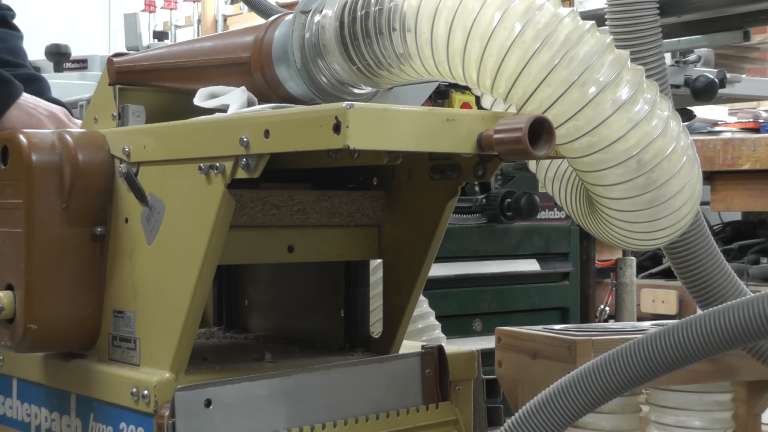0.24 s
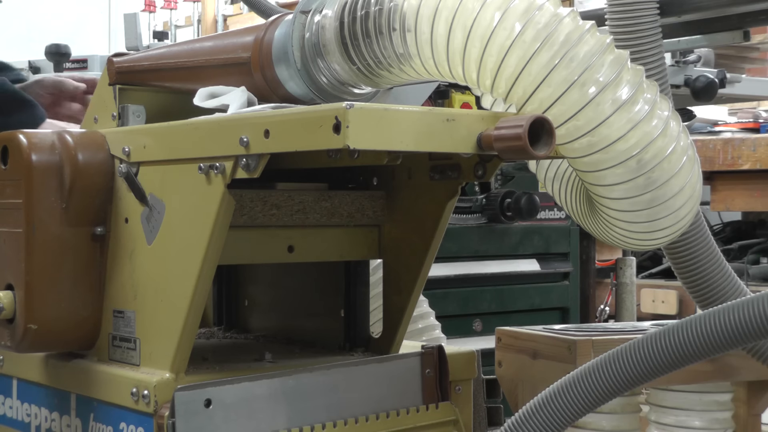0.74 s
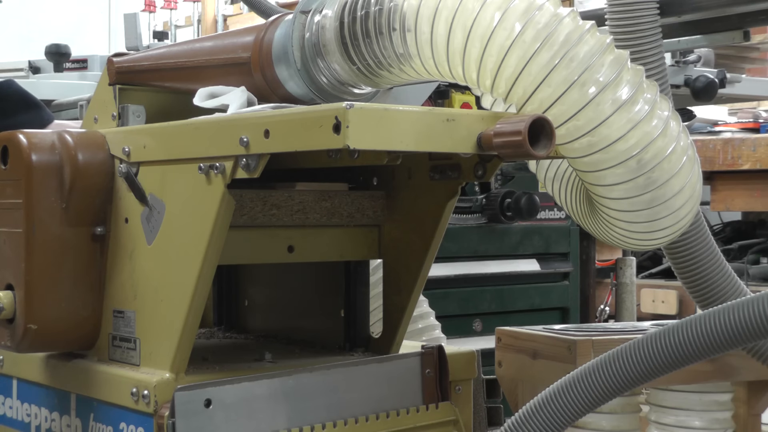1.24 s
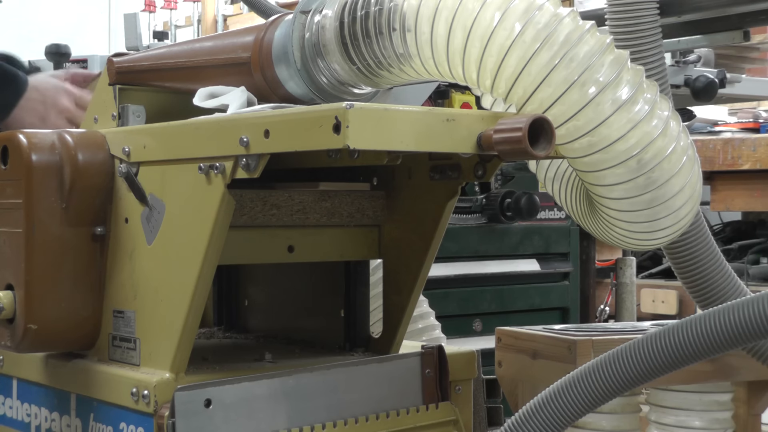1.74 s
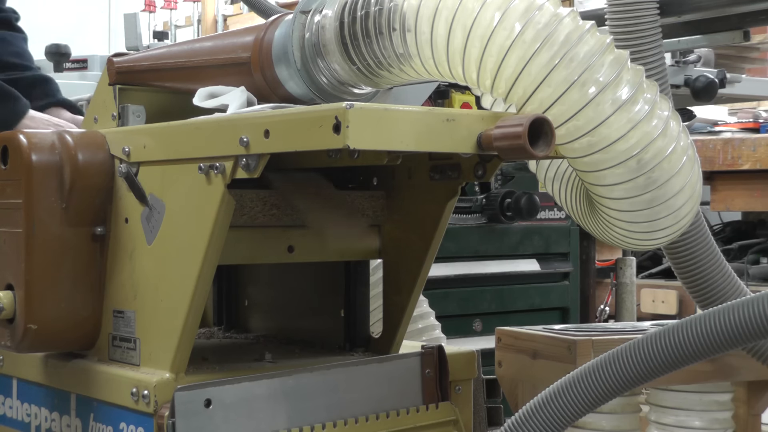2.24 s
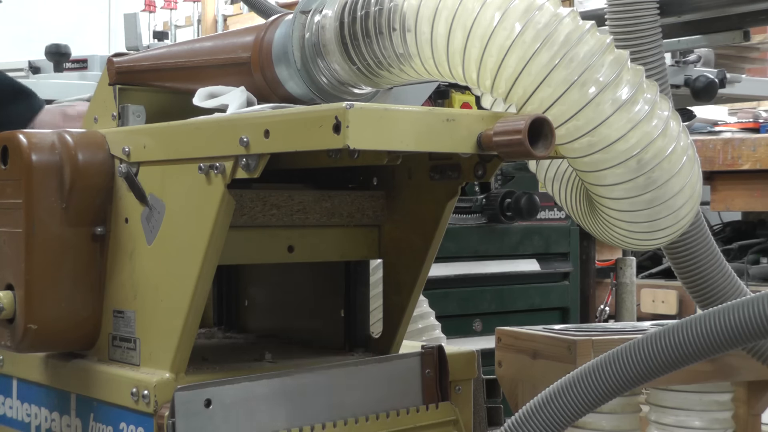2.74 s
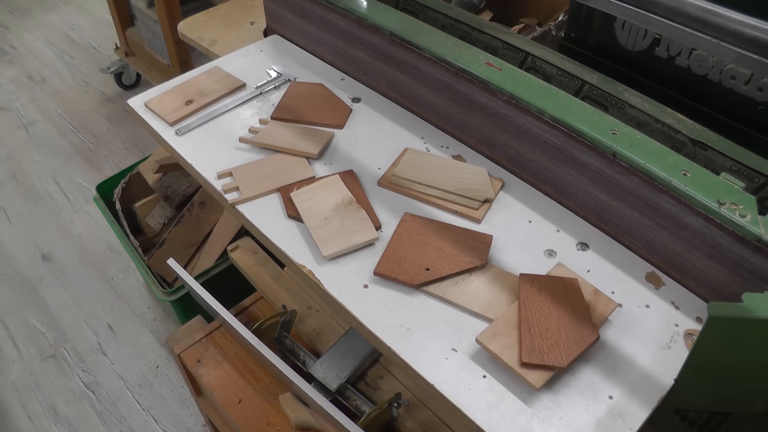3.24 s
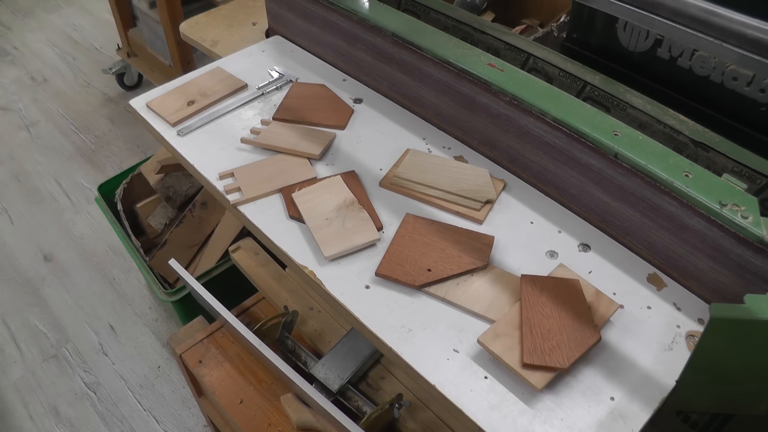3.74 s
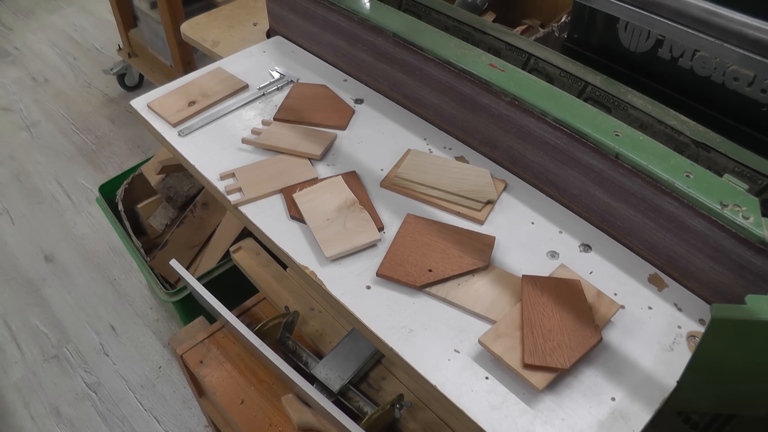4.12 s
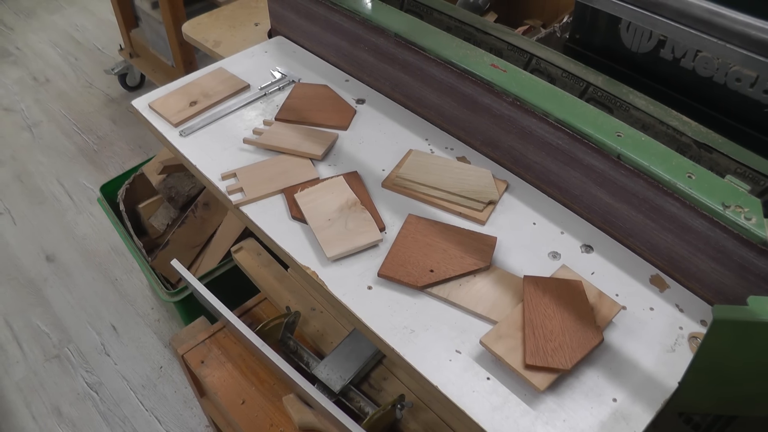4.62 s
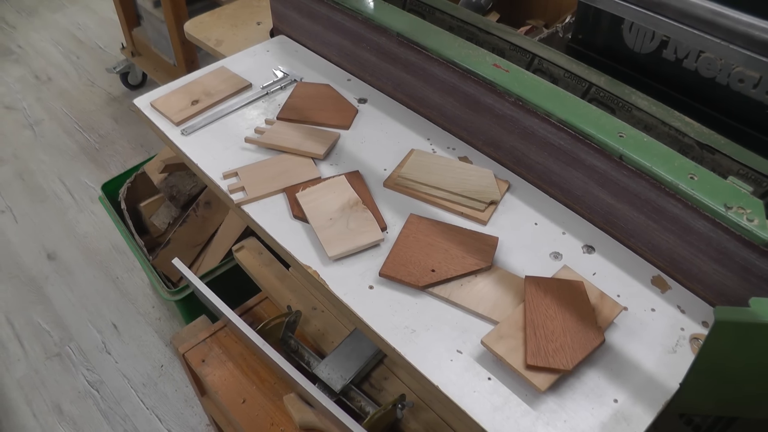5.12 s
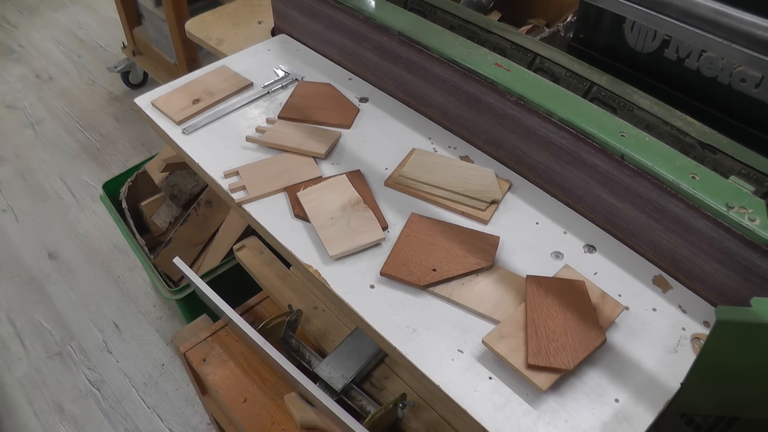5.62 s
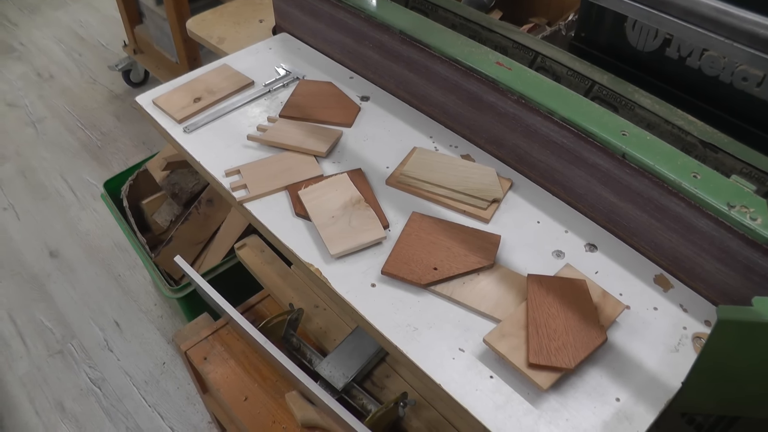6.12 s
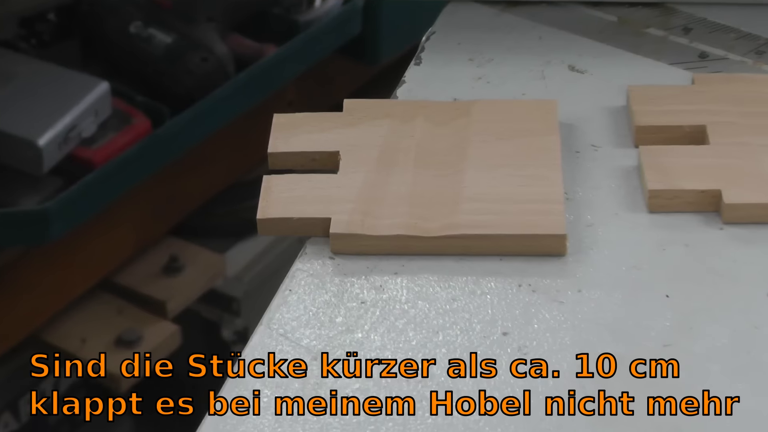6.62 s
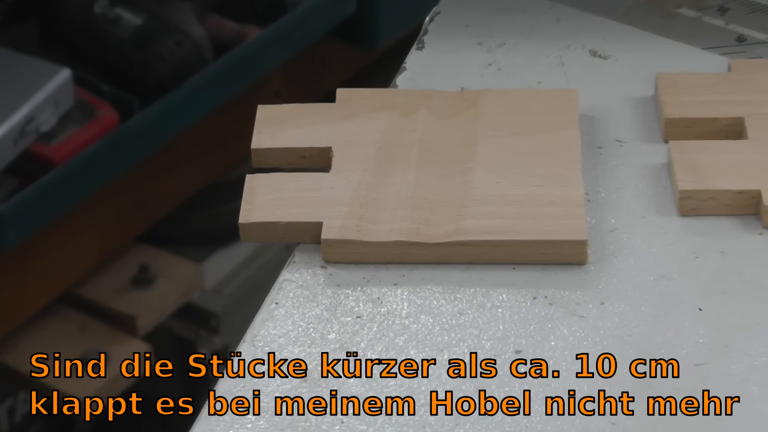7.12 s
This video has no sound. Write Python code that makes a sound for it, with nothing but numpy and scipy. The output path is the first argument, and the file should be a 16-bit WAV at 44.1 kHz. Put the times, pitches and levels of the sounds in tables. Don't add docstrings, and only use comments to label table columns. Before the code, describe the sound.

Harsh, buzzing board planing with knocks and extractor roar stops dead, leaving faint room hiss, handling ticks, one sharp snap and a weak hum.

```python
import sys
import numpy as np
from scipy import signal
from scipy.fft import rfft, irfft, next_fast_len
from scipy.io import wavfile
from scipy.ndimage import uniform_filter1d, map_coordinates

SR = 44100
rng = np.random.default_rng(int(sys.argv[2]) if len(sys.argv) > 2 else 0)


def convert_level_to_amplitude(level_db):
    exponent = np.asarray(level_db, float) / 20
    return 10 ** exponent


def wav_out(sig):
    wavfile.write(sys.argv[1], SR, np.round(np.clip(np.atleast_2d(sig).T, -1, 1) * 32767).astype(np.int16))


N = 325003
FFT_SIZE = next_fast_len(N)
T = np.arange(N) / SR
F = np.maximum(np.arange(FFT_SIZE // 2 + 1) * SR / FFT_SIZE, 1.)

CHANGES_S = [2.842, 6.421]

# start in seconds, shaft rate in Hz, air through the knife gap in dB,
# bite into the wood in dB, sharpness of the bite in dB.
PLANER = [(0, 107.4, -30.5, -32, -1), (.12, 108.5, -33.5, -36.5, 3), (.28, 107.6, -30, -33, -4),
          (.44, 107.1, -31, -35, 2), (.66, 107.7, -28.5, -33.5, -1), (.84, 108.4, -30, -35, 0.5),
          (1.07, 108.1, -30, -36.5, 3.5), (1.3, 108.6, -29, -40.5, 9), (1.4, 108.9, -29, -38.5, 5),
          (1.5, 109.6, -27.5, -56.5, 0.5), (1.6, 108.8, -25, -51, -12), (1.96, 109.2, -21.5, -48.5, -2),
          (2.03, 109.3, -23, -46.5, 4.5), (2.07, 108.5, -25.5, -35.5, 0.5), (2.22, 108.2, -26, -35.5, -3.5),
          (2.45, 108.2, -26, -34, -0.5), (2.62, 107.7, -26, -36.5, 3), (2.84, 107.5, -27.5, -31.5, -4)]
USUAL_AIR_DB, USUAL_SHARP_DB = -28, 1
# shaft multiple, level in dB at usual air, dB per dB of air.
SIREN = [(1, -69, 1.5), (2, -39.5, 0.72), (4, -28.5, 1.14), (6, -54, -2.1), (8, -38.5, 1.23),
         (10, -60.5, 2), (12, -51, 0.87), (14, -57.5, 1.05), (16, -61.5, 0.7), (18, -62, 1.2),
         (24, -66, 1.7)]
# shaft multiple, level in dB against the bite, sway in dB,
# sway rate in Hz, loudest moment in seconds.
BED = [(9, -20.5, 10.5, 0.47, 0.6), (10, -23, 2.5, 0.38, 0.43), (11, -9, 8.5, .48, 0.66),
       (12, -7, 6, .88, 2.285)]
BED_PER_SHARP = 0.61
# shaft multiple, level in dB.
SHAFT_ORDERS = [(1, -36.5), (2, -11), (3, -19), (4, 0), (5, -20.5), (6, -11), (7, -31), (8, -11),
                (9, -18.5)]
ODD_DB, ODD_SWAY_DB, ODD_SWAY_HZ, ODD_PEAK_S = -32, 7, 0.52, .6
CHATTER_RAD, CHATTER_HZ, FLUTTER_DB = .003, 44.5, 1
EVENNESS = .5
STRIKE = 0.28
CHIP_DB, ENTRY_S, ENTRY_DB, ENTRY_FADE_S = -6.5, 2.05, 6.5, 1
# frequency in Hz, density in dB per Hz.
BITE_COLOUR = [(400, -58.5), (950, -4.5), (1500, -6), (2000, -10), (2800, -8.5), (3200, -13.5), (5800, -17),
               (9200, -20.5), (11300, -23), (16000, -39.5)]
BITE_HZ = [1400, 2850, 5700, 10000]
# level in dB against the bite, dB per dB of sharpness, dB at the board's tail.
BITE = [
    (-6.5, 0.23, -1),
    (-4, 0, 0.5),
    (-1, 1, 0.5),
    (-13, 1.58, 6),
]
PATCH_DB, PATCH_HZ = 1.23, 6.99
TAIL_S = (1.07, 1.9)
# start
# in seconds, end in seconds, shaft multiple, level in dB.
SING = [(-0.05, 0.2, 16.0, -43.0), (-0.05, 0.21, 35.0, -43.0), (-0.05, 0.22, 18.0, -41.0),
        (-0.05, 0.5, 26.0, -37.0), (-0.03, 0.25, 50.0, -41.5), (-0.01, 0.28, 48.0, -40.5),
        (0.02, 0.24, 33.0, -43.5), (0.13, 0.54, 14.0, -42.5), (0.14, 0.5, 22.0, -36.5),
        (0.15, 0.45, 51.0, -47.5), (0.15, 0.47, 24.0, -38.0), (0.15, 0.75, 27.0, -39.0),
        (0.19, 0.78, 39.0, -44.5), (0.23, 0.57, 53.0, -44.5), (0.32, 0.54, 43.0, -45.5),
        (0.35, 0.67, 16.0, -43.0), (0.36, 0.56, 47.0, -43.0), (0.36, 0.73, 45.0, -41.5),
        (0.5, 0.68, 26.0, -45.5), (0.51, 0.92, 14.0, -46.0), (0.56, 0.95, 55.0, -47.0),
        (0.64, 0.88, 44.0, -46.0), (0.69, 0.88, 53.0, -43.5), (0.72, 1.04, 25.0, -41.0),
        (0.75, 1.02, 34.0, -45.0), (0.8, 1.08, 16.0, -44.5), (0.82, 1.06, 50.0, -45.5),
        (0.84, 1.08, 60.0, -44.5), (0.85, 1.06, 48.0, -45.5), (0.87, 1.28, 31.0, -43.5),
        (0.87, 1.29, 17.0, -41.0), (0.88, 1.15, 33.0, -43.0), (0.89, 1.12, 52.0, -44.5),
        (0.93, 1.22, 28.0, -43.0), (0.93, 1.48, 37.0, -40.0), (0.94, 1.28, 22.0, -42.5),
        (1.01, 1.28, 25.0, -46.5), (1.03, 1.24, 39.0, -44.5), (1.03, 1.36, 49.0, -42.5),
        (1.04, 1.23, 47.0, -41.5), (1.06, 1.42, 57.0, -39.0), (1.09, 1.45, 68.0, -46.0),
        (1.1, 1.44, 45.0, -41.0), (1.13, 1.45, 53.0, -41.0), (1.19, 1.44, 36.0, -44.0),
        (1.2, 1.44, 58.0, -42.0), (1.2, 1.5, 61.0, -46.0), (1.46, 2.07, 14.0, -47.5),
        (.17, .44, 23, -42), (.17, .44, 25, -42),
        (1.62, 2.5, 22.0, -45.5), (1.94, 2.28, 30.0, -43.0), (1.97, 2.54, 26.0, -44.0),
               (1.97, 2.57, 55.0, -49.0), (2.0, 2.23, 49.0, -44.5), (2.0, 2.27, 18.0, -44.0),
               (2.01, 2.33, 14.0, -41.0), (2.02, 2.34, 24.0, -47.5), (2.03, 2.24, 16.0, -44.5),
               (2.11, 2.43, 21.0, -42.0), (2.14, 2.49, 23.0, -42.5), (2.16, 2.48, 45.0, -48.5),
               (2.26, 2.63, 40.0, -47.0), (2.31, 2.63, 35.0, -47.5), (2.34, 2.64, 56.0, -49.0),
               (2.37, 2.83, 52.0, -45.0), (2.38, 2.69, 34.0, -47.5), (2.46, 2.75, 51.0, -48.0),
               (2.46, 2.82, 43.0, -46.5), (2.5, 2.89, 39.0, -45.0), (2.52, 2.89, 26.0, -43.5),
               (2.53, 2.75, 47.0, -48.0), (2.55, 2.89, 25.0, -41.5), (2.59, 2.83, 29.0, -45.0),
               (2.6, 2.87, 42.0, -47.0), (2.61, 2.89, 16.0, -39.0), (2.62, 2.89, 54.0, -46.5),
               (2.7, 2.89, 34.0, -45.0)]
SING_DB = -3
# frequency in Hz, density in dB per Hz.
CRUNCH = [(900, -19.5), (1400, 2.5), (2700, -2.5), (3600, -8.5), (6000, -19), (9000, -39)]
CRUNCH_DB, CRUNCH_FADE_S = -43, .35

# start in seconds, peak in dB, low ring in Hz, high ring in Hz,
# T60 in seconds.
KNOCKS = [(.079, -21, 1360, 3006, .035), (.087, -21.5, 1470, 3550, 0.056), (.088, -23, 5754, 4010, 0.032),
          (0.1, -24.5, 1160, 1600, 0.056), (.296, -27, 1350, 3600, 0.031), (.481, -21.5, 690, 1830, .04),
          (.485, -24.5, 1350, 1950, .03), (.493, -27, 1715, 1050, .05), (.497, -23.5, 947, 2908, .04),
          (.506, -28.5, 1130, 800, .06), (.515, -24, 404, 1248, 0.34), (2.044, -25.5, 2770, 3300, 0.038),
          (2.05, -27, 1710, 4670, .02), (2.075, -29.5, 3360, 5400, .02), (2.105, -27, 1820, 2680, 0.028),
          (2.135, -28.5, 3290, 5400, 0.017), (2.21, -31, 2380, 6000, .03)]
KNOCK_CRACK_DB = 3
# start in seconds, end in seconds, lowest Hz,
# highest Hz, number of chirps, level in dB.
TOP_CHIRPS = [(0, 1.45, 10200, 11700, 190, -61), (.8, 1.3, 11300, 12200, 12, -63),
              (2.05, 2.75, 10200, 11700, 90, -62), (.55, .62, 12700, 15400, 6, -70),
              (.2, 1.27, 13300, 15500, 8, -70), (1.3, 1.42, 11500, 15800, 40, -62),
              (1.5, 2.08, 10300, 11400, 40, -76), (1.5, 1.58, 12000, 15600, 14, -86),
              (1.66, 1.92, 12000, 15700, 50, -84), (1.95, 2.07, 12000, 15600, 34, -79),
              (2.13, 2.25, 12700, 15700, 8, -74), (2.43, 2.48, 11800, 15600, 12, -72)]

# frequency in Hz, density in dB per Hz.
ROAR_COLOUR = [(30, -43.5), (90, -26), (160, -17), (330, -9.5), (480, -7), (650, -1), (800, -7.5),
               (1000, -12), (1600, -17.5), (3000, -21.5), (6000, -24), (9000, -31.5), (9700, -40),
               (10300, -57.5), (16000, -69)]
ROAR_DB, ROAR_PER_AIR = -48.5, 0.83
# frequency in Hz, side minus mid in dB.
ROAR_SIDE = [(40, -3), (130, -7.5), (500, -6.5), (2000, -7.5), (10000, -16.5)]
# frequency in Hz, level in dB against the roar.
FAN = [(145.3, -10), (242.2, -2), (296.1, -2.5), (344.5, 1), (689, -9.5), (764.4, -5)]
# upper fan in Hz, how far the other lies below in Hz, upper level in dB against
# the roar, lower level in dB against the roar, loudest moment in seconds.
FAN_PAIR = (649.8, 3.713, 10.5, 4.6, 2.36)

# frequency in Hz, side minus mid in dB.
MACHINE_SIDE = [(60, -3), (130, -16), (400, -18), (700, -22.5), (1300, -13.5), (2400, -11.5), (4400, -14.5),
                (8100, -9.5), (15000, 3)]
# frequency in Hz, gain
# in dB.
MACHINE_TOP = [(9900, 0), (10700, -10), (11400, -34), (11900, -60), (16000, -70)]

# start in seconds, rattle in dB, thump in dB, crispness in dB.
TICKS = [(3.232, -36.5, -58, 9), (3.664, -39, -42, -3.5), (3.711, -46.5, -57, 1), (4.009, -47, -51, 0),
         (4.025, -32.5, -39.5, -1.5), (4.0848, -31, -43, -2.5), (4.179, -36, -59, 7.5),
         (4.206, -32.5, -40, -2), (4.219, -34.5, -43, -3.5), (4.23, -42.5, -50, 10), (4.304, -52, -62, 0),
         (4.395, -41, -60, 8), (4.42, -50, -52, -2), (4.456, -34, -41, -4), (4.463, -41.5, -55, -4),
         (4.466, -34.5, -43, 4.5), (4.469, -48, -48, 0), (4.093, -53, -54, 0), (5.0443, -32, -36.5, -1.5),
         (5.05, -38, -47, 12.5), (5.552, -58, -59, -12), (6.025, -42.5, -47, 2.5), (6.037, -32, -60, 6.5),
         (6.002, -51, -45, 2), (6.044, -34.5, -58, 11.5), (6.048, -34, -50, 7.5), (6.056, -43, -50, 12),
         (6.216, -49, -70, 6), (6.343, -39, -38.5, 17.5), (6.496, -58, -57, -12), (6.523, -57, -68, -12.5),
         (6.582, -43, -60, -6.5), (6.815, -60.5, -72, -17), (6.85, -46, -58, 2), (7.135, -58, -76, -12)]
# frequency in Hz, level in dB, T60 in seconds.
BODY = [
    (204, -3, 0.057),
    (370, -3, 0.023),
]
# lower edge in Hz, upper edge in Hz, T60 in seconds.
RATTLE = [
    (425, 1100, 0.061),
    (2447, 4140, 0.025),
    (4140, 8600, 0.037),
    (8600, 13000, .02),
    (1100, 2400, 0.025),
]
# level in dB, dB per dB of crispness.
CRISP = [
    (-4, -0.7),
    (-0.8, 0.46),
    (-3, 0.24),
    (-15.5, -0.7),
    (-11, -0.64),
]
TICK_MIC = 0.72
# (frequency in Hz, level in dB, T60 in seconds).
SNAP = (6.3384, 0.4, [(3180, 0, 0.0091), (3430, -1, 0.0068), (1590, -20, 0.013), (2198, -26, 0.007),
        (6340, -13, .01), (5670, -14, 0.0074), (7194, -17, 0.0079), (1040, -19.5, 0.023),
        (480, -26, 0.015)])
# start in seconds, peak in dB, frequency in Hz, T60 in seconds.
BUMPS = [(3.169, -64, 231, 0.084), (3.322, -41.5, 298.5, 0.073), (4.306, -50.5, 830, .07),
         (4.318, -53, 477, 0.078), (4.329, -47.5, 362, 0.07), (3.236, -50, 1100, 0.031),
         (6.342, -38.5, 400, 0.058), (4.628, -56, 165, 0.066), (5.078, -45, 189, 0.048),
         (5.293, -53.5, 140, 0.099), (5.499, -59.5, 480, 0.077)]
# touch in seconds, hardest press in seconds, let go in seconds,
# hiss in dB, rumble in dB.
RUBS = [
    (4.305, 4.308, 4.37, -70, -58),
    (5.049, 5.056, 5.085, -43, -51),
    (5.994, 6.04, 6.095, -41, -54),
    (6.04, 6.055, 6.078, -39.5, -42),
    (6.214, 6.243, 6.335, -39.5, -58),
    (6.319, 6.333, 6.45, -38.5, -50),
]
# frequency in Hz, density in dB per Hz.
RUB_HISS = [(1060, -51), (1800, -19), (1920, -31), (2050, -23), (2430, -19), (2620, -16.5), (3120, -4),
            (3670, -9.5), (4830, -4), (5800, -5), (6470, -5), (10100, -14), (16000, -31.5)]
# frequency in Hz, density in dB per Hz.
RUB_RUMBLE = [(59, -45), (100, -5), (402, -1.5), (623, -4.5), (771, 7.5), (1900, -9), (2000, -14),
              (2600, -38), (4400, -120)]
RUB_RISE, RUB_FALL, RUB_TOUCH = 1.9, 1, 0.4
# start in seconds, end in seconds, frequency in Hz, level in dB.
SQUEAKS = [(3.245, 3.335, 2750, -67), (3.255, 3.29, 6300, -69), (4.265, 4.325, 2720, -66),
           (4.26, 4.3, 6600, -69), (5.27, 5.85, 290, -71), (5.255, 5.29, 6300, -70),
           (6.035, 6.07, 3170, -46), (6.225, 6.3, 6400, -47), (6.32, 6.4, 6400, -48)]

# frequency in Hz, density in dB per Hz.
SHOP = [(15, -59), (25, -19), (117, -6.5), (149, -4), (217, -5.5), (354, -7), (754, -12.5), (863, -5.5),
        (1020, -12), (1790, -18), (4370, -22), (5280, -21.5), (16000, -27.5)]
# frequency in Hz, density in dB per Hz.
SHOP_LATE = [(15, -79), (25, -44), (161, -12.5), (195, -29), (236, -15), (405, -10.5), (659, -15),
             (887, -5), (1070, -15), (1560, -16.5), (2000, -24), (2990, -24), (16000, -33.5)]
SHOP_DB, SHOP_LATE_DB = -69, -63
# frequency in Hz, side minus mid in dB.
SHOP_SIDE = [(60, -4), (110, -2), (200, -4.5), (380, -0.5), (700, -2), (1290, -3), (2380, -8),
             (4400, -11.5), (8120, -5.5), (15000, -1)]
TREBLE_DIPS_S = [3.222, 4.075, 4.202, 5.036, 6.208]
# frequency in Hz, width in Hz, gain in dB.
MIC_PEAKS = [(2356, 59, 10.5), (3020, 550, 11), (5240, 640, 11), (6670, 710, 6.5)]
# frequency in Hz, width in Hz, level in dB.
HUM = [(194.6, 12, -73.5), (400, 43, -76), (910, 72, -67), (1556, 57, -77.5)]


def planer():
    end = int(CHANGES_S[0] * SR)
    t = T[:end]
    hz, air_db, bite_db, sharp_db = curves(PLANER, end)
    air_db, sharp_db = air_db - USUAL_AIR_DB, sharp_db - USUAL_SHARP_DB
    angle = 2 * np.pi * np.cumsum(uniform_filter1d(hz, size=5000)) / SR
    out = np.zeros(N)

    def steady(order):
        force = np.sqrt(2) * convert_level_to_amplitude(0.6 * walk(25.07, end))
        return force * np.sin(round(order) * (angle + 1.111) + 0.1012 * walk(11.0, end))

    for order, db, per_air in SIREN:
        out[:end] += convert_level_to_amplitude(db + per_air * air_db) * steady(order)
    for order, db, sway_db, sway_hz, peak_s in BED:
        sway = sway_db * np.cos(2 * np.pi * sway_hz * (t - peak_s))
        out[:end] += convert_level_to_amplitude(bite_db + BED_PER_SHARP * sharp_db + db + sway) * steady(order)
    for order, db in SHAFT_ORDERS[2:8:2]:
        sway = ODD_SWAY_DB * np.cos(2 * np.pi * ODD_SWAY_HZ * (t - ODD_PEAK_S))
        tone = np.sin(int(order) * angle + walk(1.9, end))
        out[:end] += convert_level_to_amplitude(ODD_DB + db + sway + walk(3.1, end)) * tone

    bite, singing = knife_harmonics(angle, end)
    out += singing
    chips = colour(rng.standard_normal(N), [(1500, -1.3), (5000, 1.0), (10000, 6.0)])[:end]
    chips = chips * (1 + 0.62 * np.cos(2 * angle))
    entry = (t > ENTRY_S) * np.exp(-np.abs(t - ENTRY_S) / ENTRY_FADE_S)
    chip_db = CHIP_DB + ENTRY_DB * entry
    tonal = level(bite[:end], 0) * convert_level_to_amplitude(FLUTTER_DB * walk(70, end))
    bite[:end] = (tonal + convert_level_to_amplitude(chip_db) * chips) / np.sqrt(1 + convert_level_to_amplitude(2 * chip_db))
    bite = colour(bite, BITE_COLOUR)
    for k, (db, per_sharp, tail_db) in enumerate(BITE):
        band = shape(bite, np.interp(np.log(F), np.log(BITE_HZ), np.eye(len(BITE_HZ))[k]))
        band_db = bite_db + per_sharp * sharp_db + tail_db * swell(*TAIL_S, t)
        out[:end] += level(band[:end], db) * convert_level_to_amplitude(band_db + PATCH_DB * walk(PATCH_HZ, end))

    onset = np.clip((t - ENTRY_S) / .02 + 1, 0, 1)
    fade = np.exp(-np.abs(t - ENTRY_S) / CRUNCH_FADE_S)
    out[:end] += noise(CRUNCH, CRUNCH_DB)[:end] * convert_level_to_amplitude(3.0 * walk(60, end)) * onset * fade
    return out


def knife_harmonics(angle, end):
    bite, singing = np.zeros(N), np.zeros(N)
    turn = np.exp(1j * (angle + CHATTER_RAD * walk(CHATTER_HZ, end)))
    phasor = turn ** 12
    for order in range(13, 109):
        phasor = phasor * turn
        a, b = STRIKE + coarse(4.5, end), coarse(4.5, end)
        even = (a * a + b * b + .05) ** (-EVENNESS / 2)
        partial = phasor.real * fine(a * even, end) + phasor.imag * fine(b * even, end)
        bite[:end] += partial
        for t0, t1, sung_order, db in SING:
            if sung_order != order:
                continue
            i = slice(max(int(t0 * SR), 0), min(int(t1 * SR), end))
            gain = np.sqrt(2) * convert_level_to_amplitude(db + SING_DB + 2.0 * walk(30, i.stop - i.start))
            singing[i] += gain * swell(t0, t1, T[i]) ** 0.94 * partial[i]
    return bite, singing


def boards():
    out = np.zeros(N)
    for s, db, low_hz, high_hz, t60 in KNOCKS:
        contact = rng.standard_normal(600) * np.exp(-T[:600] / 0.0036)
        modes = [(low_hz, 0, t60), (high_hz, -2, 1.2 * t60),
                 (1.2 * low_hz, -5, 0.45 * t60), (1.6 * high_hz, -6, 0.37 * t60)]
        y = np.convolve(contact, ring(modes))
        crack = rng.standard_normal(1500) * np.exp(-T[:1500] / .009) / 3
        add(out, convert_level_to_amplitude(db) * y / np.abs(y).max(), s)
        add(out, convert_level_to_amplitude(db + KNOCK_CRACK_DB) * crack, s)
    return out


def top_chirps():
    out, t = np.zeros(N), T[:1900]
    for t0, t1, lo_hz, hi_hz, chirps, db in TOP_CHIRPS:
        for when, pitch, size in rng.random((chirps, 3)):
            hz = lo_hz + pitch * (hi_hz - lo_hz)
            pair = np.sin(2 * np.pi * hz * t) + size * np.sin(2 * np.pi * (hz + 55) * t)
            y = np.hanning(len(t)) * pair
            add(out, convert_level_to_amplitude(db - 5.5 * size) * y, max(t0 + when * (t1 - t0) - .02, 0))
    return out


def extractor():
    tones = np.zeros(N)
    for hz, db in FAN:
        tones += convert_level_to_amplitude(db + 2.0 * walk(9.15, N)) * np.sin(2 * np.pi * hz * T + .5 * walk(4.2, N))
    hz, beat_hz, high_db, low_db, s = FAN_PAIR
    tones += convert_level_to_amplitude(high_db) * np.sin(2 * np.pi * hz * (T - s))
    tones += convert_level_to_amplitude(low_db) * np.sin(2 * np.pi * (hz - beat_hz) * (T - s))
    roar_db = ROAR_DB + ROAR_PER_AIR * (curves(PLANER, N)[1] - USUAL_AIR_DB)
    air = noise(ROAR_COLOUR, 8.23)
    air = air + opposed(colour(np.roll(air, N // 2), ROAR_SIDE))
    return convert_level_to_amplitude(roar_db) * (air * convert_level_to_amplitude(1.0 * walk(9.95, N)) + tones)


def ticks():
    out, t = np.zeros(N), T[:3000]
    rattles = []
    for lo_hz, hi_hz, _ in RATTLE:
        band = signal.butter(4, [lo_hz, hi_hz], "band", fs=SR, output="sos")
        rattles.append(signal.sosfilt(band, mic(rng.standard_normal(N), TICK_MIC)))
    for s, db, thump_db, crisp_db in TICKS:
        modes = [(f * (1 + 0.11 * rng.standard_normal()), g, d) for f, g, d in BODY]
        thump = ring(modes, size=3000) * np.minimum(t / 0.00088, 1)
        add(out, convert_level_to_amplitude(thump_db + 3) * thump, s + 0.00234)
        for (part_db, per_crisp), x, (_, _, t60) in zip(CRISP, rattles, RATTLE):
            decay = np.exp(-t / 0.0012) + 0.43 * np.exp(-np.log(1000) * t / t60)
            y = x[int(s * SR):][:len(t)] * np.minimum(t / 0.00022, 1) * decay
            add(out, convert_level_to_amplitude(db + part_db + per_crisp * crisp_db - 3.0) * y / np.abs(y).max(), s + .002)
    soft_start = np.minimum(T[:8192] / 0.0014, 1)
    snap_s, snap_db, snap_modes = SNAP
    add(out, convert_level_to_amplitude(snap_db) * ring(snap_modes) * soft_start, snap_s)
    for s, db, hz, t60 in BUMPS:
        add(out, convert_level_to_amplitude(db) * ring([(hz, 0, t60)]) * soft_start, s)
    return out


def rubs():
    grain = convert_level_to_amplitude(1.3 * walk(500, N))
    hiss, rumble = noise(RUB_HISS, 0) * grain, noise(RUB_RUMBLE, 0) * grain
    out = np.zeros(N)
    for touch, hardest, let_go, hiss_db, rumble_db in RUBS:
        ramp = np.interp(T, [touch, hardest, let_go], [RUB_TOUCH, 1, 0], left=0)
        press = ramp ** np.where(T < hardest, RUB_RISE, RUB_FALL)
        out += press * (convert_level_to_amplitude(hiss_db) * hiss + convert_level_to_amplitude(rumble_db) * rumble)
    return out * (T < CHANGES_S[1])


def squeaks():
    out = np.zeros(N)
    for t0, t1, hz, db in SQUEAKS:
        creak = shape(rng.standard_normal(N), 1 / (1 + ((F - hz) / (0.08 * hz)) ** 2))
        out += swell(t0, t1) * level(creak, db)
    return out


def shop(points, db):
    mid, side = (mic(noise(points, db)) for _ in range(2))
    hiss = mid + opposed(colour(side, SHOP_SIDE))
    gap = sum(np.exp(-((T - s) / 0.0052) ** 4) for s in TREBLE_DIPS_S)
    bass = signal.sosfiltfilt(signal.butter(2, 1300, fs=SR, output="sos"), hiss)
    return convert_level_to_amplitude(0.91 * walk(3.6, N)) * (hiss - 0.87 * gap * (hiss - bass))


def hum():
    tones = convert_level_to_amplitude(-67) * np.sin(2 * np.pi * 897 * T + 1.7 * walk(12, N))
    for hz, width, db in HUM:
        tones += level(shape(rng.standard_normal(N), 1 / (1 + (2 * (F - hz) / width) ** 2)), db)
    return tones * convert_level_to_amplitude(2.0 * (T - 7.0))


def mic(x, share=1):
    peaks_db = sum(g / (1 + (2 * (F - f) / w) ** 2) for f, w, g in MIC_PEAKS)
    return shape(x, convert_level_to_amplitude(share * peaks_db))


def widen(x, points, spread_s):
    steps = rng.standard_normal(len(F))
    scatter = np.cumsum(steps) * np.sqrt(spread_s * F[1]) * np.minimum(F / 4000, 1) ** 4
    return x + opposed(shape(colour(x, points), 1j * np.exp(1j * scatter)))


def opposed(side):
    return side * np.array([[1], [-1]])


def ring(modes, size=8192):
    t, y = T[:size], np.zeros(size)
    for hz, db, t60 in modes:
        y += convert_level_to_amplitude(db) * np.sin(2 * np.pi * hz * t) * np.exp(-np.log(1000) * t / t60)
    return y / np.abs(y).max()


def shape(x, gain):
    return irfft(rfft(x, FFT_SIZE) * gain, FFT_SIZE)[:N]


def colour(x, points):
    hz, db = np.transpose(points)
    return shape(x, convert_level_to_amplitude(np.interp(np.log(F), np.log(hz), db)))


def level(x, db):
    return x * convert_level_to_amplitude(db) / np.sqrt(np.mean(x ** 2))


def noise(points, db):
    return level(colour(rng.standard_normal(N), points), db)


def coarse(rate, size):
    knots = rng.standard_normal(int(size / SR * rate) + 4)
    return map_coordinates(knots, [np.arange(0, size + 32, 32) * rate / SR], order=2)


def fine(x, size):
    return np.interp(np.arange(size), 32 * np.arange(len(x)), x)


def walk(rate, size):
    return fine(coarse(rate, size), size)


def curves(table, end):
    s, *columns = np.transpose(table)
    return [np.interp(T[:end], s, c) for c in columns]


def swell(t0, t1, t=T):
    return np.sin(np.pi * np.clip((t - t0) / (t1 - t0), 0, 1))


def add(out, x, s):
    i = int(s * SR)
    out[i:i + len(x)] += x[:N - i]


def scene():
    knocks = colour(boards(), [(100, -27.0), (300, 1.0), (6500, 1.0), (11000, -43.5)])
    machine = widen(planer() + knocks, MACHINE_SIDE, .08) + extractor()
    machine = np.array([colour(x, MACHINE_TOP) for x in machine])
    machine = machine + 1.7 * top_chirps() + opposed(.9 * top_chirps())

    low_cut = signal.butter(2, 100, "high", fs=SR, output="sos")
    hands = signal.sosfilt(low_cut, ticks() + rubs() + squeaks())
    hands_side = [(100, -18), (1500, 0.5), (4000, -13.5), (9000, -9.5), (12000, -1.5)]
    hands = widen(hands, hands_side, .004)

    late = shop(SHOP_LATE, SHOP_LATE_DB - 2.0) + hum()
    quiet = np.where(T < CHANGES_S[1], shop(SHOP, SHOP_DB), late)
    fade = np.clip((CHANGES_S[0] - T) / 0.00066, 0, 1)
    return fade * machine + (1 - fade) * (quiet + hands)


def top_cut(x):
    return signal.sosfilt(signal.butter(12, 16390, fs=SR, output="sos"), x)


def record(dry):
    mix = np.array([shape(x, F < 15820) for x in dry])
    return top_cut(mix)


dry = scene()
out = record(dry)
wav_out(out)
```